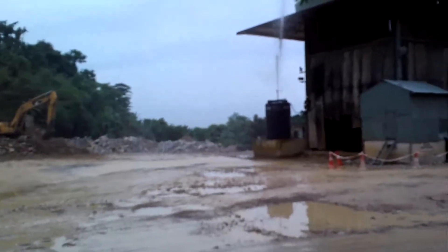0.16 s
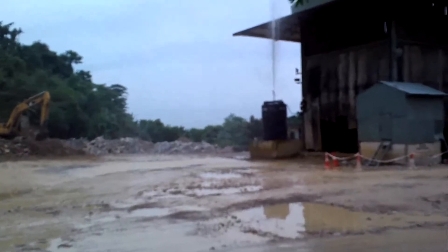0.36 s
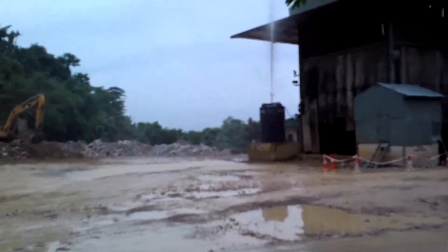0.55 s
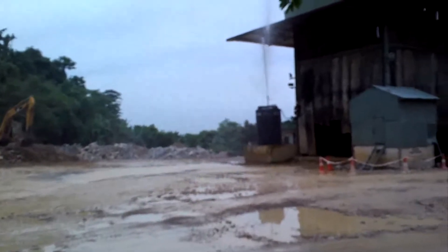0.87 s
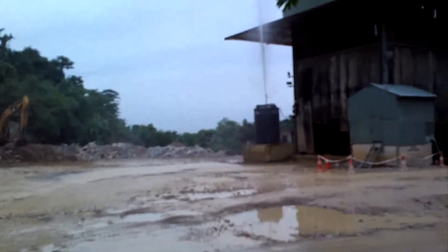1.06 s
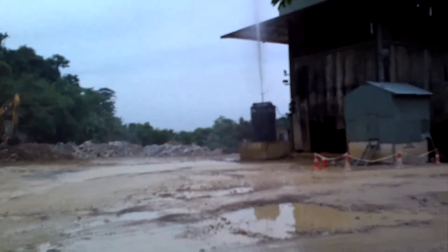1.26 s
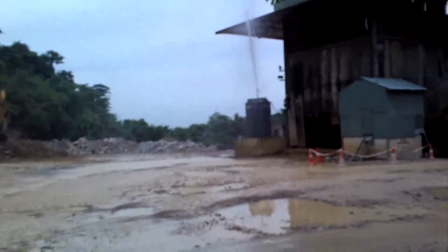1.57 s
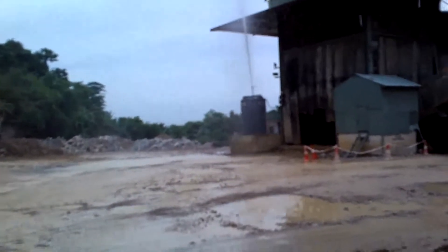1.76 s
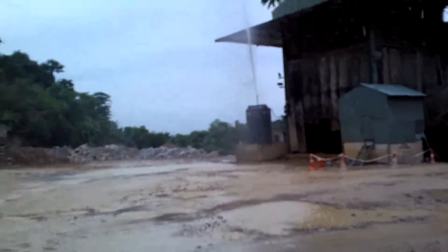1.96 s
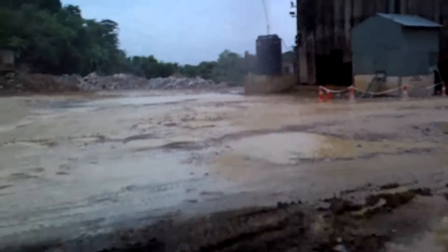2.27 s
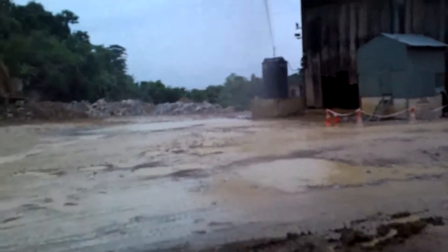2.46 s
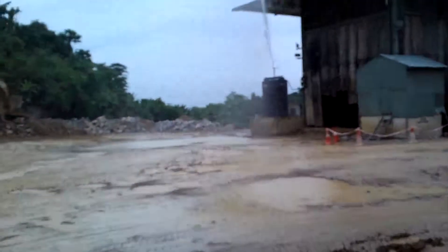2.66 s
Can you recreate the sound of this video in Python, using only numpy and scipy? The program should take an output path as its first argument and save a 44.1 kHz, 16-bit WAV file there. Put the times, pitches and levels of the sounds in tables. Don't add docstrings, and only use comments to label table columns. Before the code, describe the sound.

A hollow metal bang strikes at about 0.25 s, its short clanging ring followed by dense echoes fading over roughly a second in an open yard. Thin water hiss, soft patter and far plant drone continue throughout. From 1.7 s a distant rubble load rumbles, peaking near 2.1 s with wind buffeting, drop ticks and tiny dropouts; spray is strongest around 2.3 s. Sound is coarse, warbly and sharp in the treble.

```python
import sys
import numpy as np
from scipy import signal
from scipy.fft import rfft, irfft, next_fast_len
from scipy.io import wavfile
from scipy.ndimage import uniform_filter1d

SR = 44100
rng = np.random.default_rng(int(sys.argv[2]) if len(sys.argv) > 2 else 0)


def amplitude_ratio(level_db):
    exponent = np.asarray(level_db, float) / 20
    return 10 ** exponent


def int16_out(signal):
    q = np.round(np.clip(np.atleast_2d(signal).T, -1, 1) * 32767)
    wavfile.write(sys.argv[1], SR, q.astype(np.int16))


N = 123479

# time in seconds, level in dB.
SPRAY_LEVEL = [(0, -40.5), (.25, -41), (.5, -40.5), (.8, -40), (1.05, -39.5), (1.4, -39), (1.65, -36),
               (1.8, -36), (1.9, -37), (2.05, -35.5), (2.2, -31), (2.3, -29.5), (2.55, -32), (2.8, -32.5)]
# frequency in Hz, density in dB per Hz.
SPRAY_SPECTRUM = [(2000, -19), (3300, -15.5), (4400, -15.5), (5300, -17), (6400, 2.5), (7600, -7),
                  (9000, -18), (11500, -24)]
# time in seconds, level in dB, pitch in Hz.
NEAR_DROPS = [(.927, -36, 9800), (1.035, -36, 4500), (1.289, -34, 9900), (1.2893, -34, 10900),
              (1.289, -36, 3500), (1.459, -35, 2800), (1.718, -34, 9200), (1.7183, -35, 10300),
              (2.054, -31, 3700), (2.058, -31, 9300), (2.075, -28, 9300), (2.0965, -31, 9000),
              (2.081, -31, 3200), (2.102, -31, 4300), (2.118, -31, 4400), (2.1295, -31, 10600),
              (2.236, -29, 9800), (2.319, -19, 6500)]
# frequency in Hz, level in dB, T60 in seconds.
BODY_MODES = [(244, -17.5, 0.33), (387, -11.5, 0.37), (433.3, -20, 0.5), (535, -16.5, 0.21),
              (577, -16.5, 0.58), (601, -1.5, 0.097), (629, -12, 0.55), (686.6, -25.5, 1),
              (1000, -12.5, 0.11), (1266, -11, 0.39), (2070, -18, 0.34), (3180, -15, .05)]
# frequency in Hz, density in dB per Hz.
ECHO_SPECTRUM = [(59, -60.5), (130, -40), (215, 1), (254, -6), (309, -14.5), (600, -6.5), (2000, -21),
                 (2900, -27), (3750, -27), (4400, -25.5), (6500, -49.5), (11000, -120)]
# frequency in Hz, T60 in seconds.
ECHO_T60 = [(200, 1.0), (600, 0.95), (1500, 0.8), (2800, .8), (4000, 0.28)]
# frequency in Hz, density in dB per Hz.
RUMBLE_SPECTRUM = [(35, -61), (60, -12.5), (206, 1.5), (706, -1), (776, -3), (1470, -22.5), (2500, -20.5),
                   (3250, -32), (5500, -120)]
# time in seconds, level in dB.
RUMBLE_LEVEL = [(1.6, -61), (1.8, -36.5), (1.98, -31.5), (2.15, -30), (2.3, -40.5), (2.8, -43)]
# frequency in Hz, density in dB per Hz.
YARD_SPECTRUM = [(40, -25), (120, -11), (190, 2.5), (450, -2.5), (740, -1.5), (1700, -4.5), (2600, -21.5),
                 (4500, -19.5)]
# centre in seconds, length in seconds, rise in dB.
GUSTS = [
    (1.86, 0.039, 10.5),
    (2.081, 0.076, 17),
    (2.23, 0.038, 5),
    (2.714, 0.089, -9),
]
# frequency in Hz, likeness from 0 to 1.
LIKENESS = [(60, 0.72), (170, 1), (500, 0.95), (1400, .87), (3000, 0.35), (6300, .6), (7200, 0.49),
            (8200, 0.0)]
# start in seconds, length in seconds.
SILENCES = [
    (2.0463, .0058),
    (2.0677, .0058),
    (2.0890, .0058),
    (2.1103, .0058),
    (2.2197, .0032),
    (2.2385, .0190),
]
# frequency in Hz, step in dB.
STEP_SHAPE = [(60, 1), (200, -4), (1200, -3), (2100, 0), (2450, 3.5), (3900, 3), (4400, 0), (4800, 2),
              (5800, 0), (10500, 0), (11300, 12)]
# start in seconds, length in seconds.
SHORT_BLOCKS = [
    (.2435, .014),
    (.6595, .021),
    (.9155, .021),
    (1.022, .021),
    (1.278, .021),
    (1.449, .021),
    (1.705, .021),
    (2.046, .088),
    (2.217, .042),
]
# start in seconds, length in seconds, step change in dB.
BIT_SHARE = [
    (.215, .029, 2),
    (.2445, .013, -5),
    (.28, .012, -6),
    (.30, .036, 3),
    (2.14, .07, 1.5),
    (2.257, .03, -14),
]

LEFT_RIGHT = np.array([[1], [-1]])


def rms_one(x):
    return x / np.sqrt(np.mean(x ** 2) + 1e-20)


def in_time(rows):
    return np.interp(np.arange(N) / SR, *np.transpose(rows))


def at_hz(points, hz):
    table_hz, value = np.array(points).T
    return np.interp(np.log(hz), np.log(table_hz), value)


def drift(rate_hz):
    r = np.exp(-80 * np.pi * rate_hz / SR)
    slow = signal.lfilter([1], [1, -2 * r, r * r], rng.standard_normal(N // 40 + 2002))[2000:]
    return np.interp(np.arange(N) / 40, np.arange(len(slow)), rms_one(slow - slow.mean()))


def butter(x, order, hz, kind):
    return signal.sosfilt(signal.butter(order, hz, kind, fs=SR, output="sos"), x)


def ring(clicks, hz, t60_s):
    r, w = amplitude_ratio(-60 / (t60_s * SR)), 2 * np.pi * hz / SR
    return signal.lfilter([0, np.sin(w)], [1, -2 * r * np.cos(w), r * r], clicks + 1e-18)


def banded(spectrum, shared_db, own_db, shape=lambda hz: 1):
    size = next_fast_len(N)
    hz = np.fft.rfftfreq(size, 1 / SR) + 1e-3
    alike = np.clip(at_hz(LIKENESS, hz), 0, .995)
    mid, side = rfft(rng.standard_normal((2, size)))
    pair = np.sqrt(1 + alike) * mid + np.sqrt(1 - alike) * side * LEFT_RIGHT
    edge = np.clip(hz / spectrum[0][0], 0, 1) ** 4 * np.clip(spectrum[-1][0] / hz, 0, 1) ** 8
    both = amplitude_ratio(at_hz(spectrum, hz)) * edge * pair
    both = both / np.sqrt(np.mean(irfft(both, size) ** 2))
    together_db = shared_db * (drift(1.8) + drift(37.5))
    out = 0
    for centre_hz in 2 ** np.arange(5, 14, .5):
        window = np.cos(np.pi / 2 * np.clip(2 * np.log2(hz / centre_hz), -1, 1)) ** 2
        band = irfft(both * window, size)[:, :N]
        out = out + band * amplitude_ratio(together_db + own_db * drift(24)) * shape(centre_hz)
    return out


def drops(per_s, low_hz, high_hz, cycles, tone):
    size_db = 6.5 * np.minimum(rng.exponential(1, N), 3.0)
    sizes = amplitude_ratio(size_db) * rng.choice([-1, 1], N)
    born = rng.random(N) < per_s * amplitude_ratio(3 * drift(12)) / SR
    dealt = rng.integers(0, 16, N)
    out = 0
    for k, hz in enumerate(np.geomspace(low_hz, high_hz, 16)):
        pan_db = 2.5 * rng.standard_normal() * LEFT_RIGHT
        out = out + ring(sizes * born * (dealt == k), hz, cycles / hz) * amplitude_ratio(at_hz(tone, hz) + pan_db)
    return rms_one(out)


def near_drops():
    pan_db, t60_s = 5, .004
    out = 0
    for k, (s, db, hz) in enumerate(NEAR_DROPS):
        click = np.zeros(N)
        click[int(s * SR)] = 1
        out = out + amplitude_ratio(db + pan_db * (-1) ** k * LEFT_RIGHT) * ring(click, hz, t60_s)
    return out


def spray():
    hiss = banded(SPRAY_SPECTRUM, shared_db=1.42, own_db=1.19)
    grain = drops(820, 5600, 8000, 3.9 * 3, SPRAY_SPECTRUM)
    grain = amplitude_ratio(-8.5) * butter(grain, 4, 5500, "high")
    return amplitude_ratio(in_time(SPRAY_LEVEL)) * (hiss + grain) + near_drops()


def bang():
    start_s, level_db, contact_hz, body_low_hz = .2440, 1, 451, 226
    echo_db, echo_rise_s, echo_lag_s = -15.5, .0035, .014
    click = np.zeros(N)
    click[int(start_s * SR) + np.array([0, 70])] = .4, .8
    r = np.exp(-2 * np.pi * contact_hz / SR)
    push = signal.lfilter([(1 - r) ** 2], [1, -2 * r, r * r], click + 1e-18)
    push = butter(push, 2, body_low_hz, "high")
    direct = sum(amplitude_ratio(level_db + db) * ring(push, hz, t60_s) for hz, db, t60_s in BODY_MODES)
    age_s = np.clip(np.arange(N) / SR - start_s - echo_lag_s, 0, None)

    def dying(hz):
        return (1 - np.exp(-age_s / echo_rise_s)) * amplitude_ratio(-60 * age_s / at_hz(ECHO_T60, hz))

    return direct + amplitude_ratio(echo_db) * banded(ECHO_SPECTRUM, shared_db=.7, own_db=1.2, shape=dying)


def rumble():
    return amplitude_ratio(in_time(RUMBLE_LEVEL)) * banded(RUMBLE_SPECTRUM, shared_db=.7, own_db=1.2)


def wind():
    level_db, low_hz, high_hz, alike = -59.5, 29.2, 66, .68
    t = np.arange(N) / SR
    common, own = butter(rng.standard_normal((2, N)), 2, [low_hz, high_hz], "band")
    air = alike * common + (1 - alike) * own * LEFT_RIGHT
    gust_db = sum(db * np.exp(-((t - s) / length_s) ** 2) for s, length_s, db in GUSTS)
    return amplitude_ratio(level_db + gust_db + 0.57 * drift(5.3)) * rms_one(air)


def yard():
    drone = amplitude_ratio(-35) * banded(YARD_SPECTRUM, shared_db=0.83, own_db=1.96)
    patter = amplitude_ratio(-62.5) * drops(360, 500, 1500, 21, YARD_SPECTRUM)
    return drone + patter + wind()


def scene():
    return spray() + bang() + rumble() + yard()


def coarse(x, blocks, spare_db, wander_db):
    frame, first = 941, 382
    kept_share, dead_zone = .088, .62
    band_wander_db, loud_from_db, loud_cost = 2.2, -29, .24
    hop = frame // blocks
    lead = 2 * frame - first
    count = (N + lead) // hop + 2
    mid_side = np.array([[1, 1], [1, -1]]) / np.sqrt(2)
    padded = np.pad(mid_side @ x, ((0, 0), (lead, (count + 1) * hop - N - lead)))

    n, k = np.arange(2 * hop), np.arange(hop) + .5
    window = np.sin(np.pi * (n + .5) / (2 * hop))
    basis = np.sqrt(2 / hop) * window * np.cos(np.pi / hop * np.outer(k, n + .5 + hop / 2))
    starts, hz = np.arange(count) * hop, k * SR / 2 / hop
    shape = amplitude_ratio(at_hz(STEP_SHAPE, hz))
    lines = padded[:, starts[:, None] + n] @ basis.T / shape

    edge = np.quantile(np.abs(lines), 1 - kept_share, axis=(0, 2))
    edge = np.abs(uniform_filter1d(edge, size=blocks)) + 1e-9
    by_band_db = band_wander_db * rng.standard_normal((count, 64))[:, (hz / 400).astype(int)]
    by_frame_db = spare_db[np.clip(starts + hop - lead, 0, N - 1)] + wander_db * rng.standard_normal(count)
    level_db = 10 * np.log10(np.mean(lines ** 2, axis=(0, 2)) + 1e-12)
    by_frame_db = by_frame_db + loud_cost * np.maximum(level_db - loud_from_db, 0)
    step = edge[:, None] / dead_zone * amplitude_ratio(by_frame_db[:, None] + by_band_db)

    rounded = np.sign(lines) * np.floor(np.abs(lines) / step + 1 - dead_zone) * step
    kept = (rounded * shape) @ basis
    early = np.pad(kept[..., :hop], ((0, 0), (0, 1), (0, 0)))
    late = np.pad(kept[..., hop:], ((0, 0), (1, 0), (0, 0)))
    return mid_side @ (early + late).reshape(2, -1)[:, lead:lead + N]


def band_limit(x):
    return signal.sosfilt(signal.butter(12, 11540, fs=SR, output="sos"), x)


def record(dry):
    fade_s, short_db, drop_bits_db, drop_reach_s = .0006, 2.5, -3, .002
    t, gate, short = np.arange(N) / SR, np.ones(N), np.zeros(N)
    for s, length_s in SILENCES:
        gate *= np.clip(np.maximum(s - t, t - s - length_s) / fade_s, 0, 1)
    for s, length_s in SHORT_BLOCKS:
        short += (t > s) & (t < s + length_s)
    short = uniform_filter1d(short, size=120)
    spare_db = sum(db * ((t > s) & (t < s + length_s)) for s, length_s, db in BIT_SHARE)
    stored = (1 - short) * coarse(dry, 1, spare_db, wander_db=.6)
    at_drop = np.any([np.abs(t - s) < drop_reach_s for s, db, hz in NEAR_DROPS], axis=0)
    spare_db = spare_db + short_db + drop_bits_db * at_drop
    stored = stored + short * coarse(dry * gate, 8, spare_db, wander_db=2.6)
    stored = butter(stored, 2, 45, "high")
    return band_limit(stored * np.abs(uniform_filter1d(gate, size=60)) ** .5)


dry = scene()
out = record(dry)
int16_out(out)
```